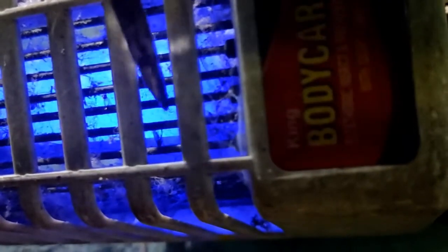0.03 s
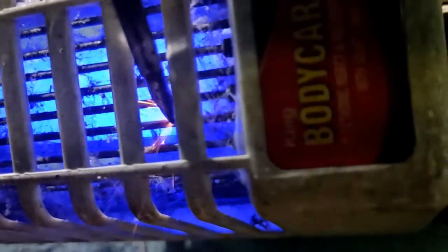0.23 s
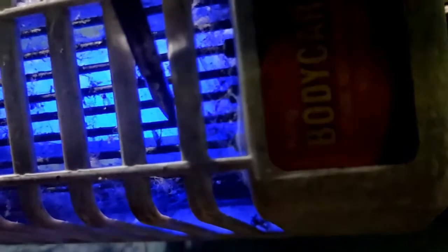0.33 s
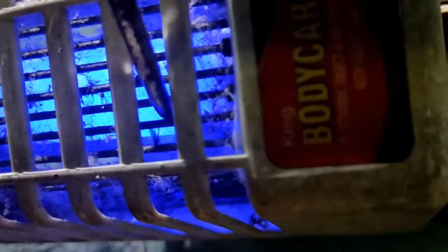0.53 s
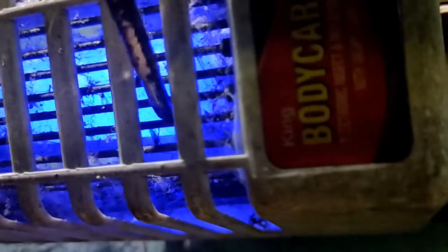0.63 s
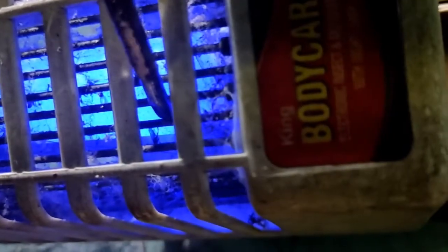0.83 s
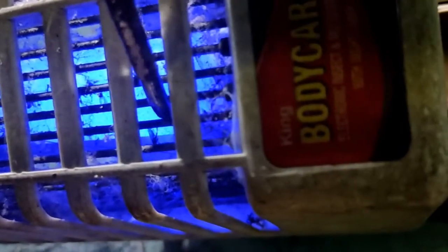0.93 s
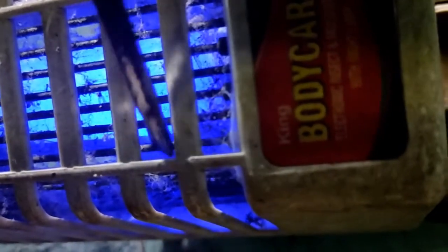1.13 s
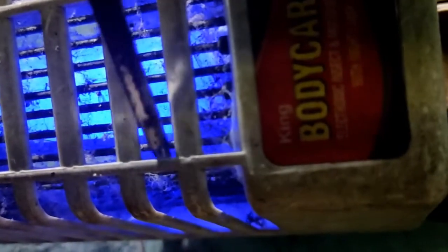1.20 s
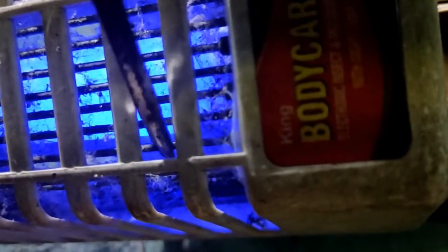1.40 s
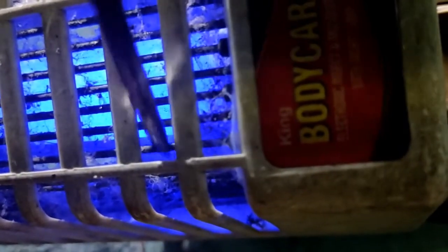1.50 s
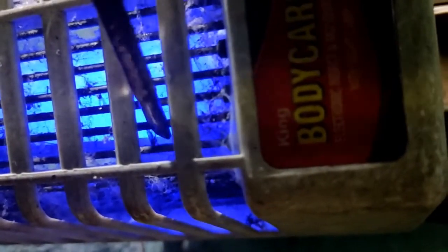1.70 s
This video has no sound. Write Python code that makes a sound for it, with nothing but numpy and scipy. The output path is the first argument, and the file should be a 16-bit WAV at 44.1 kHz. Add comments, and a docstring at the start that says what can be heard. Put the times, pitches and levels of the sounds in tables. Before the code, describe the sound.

An insect zapper crackles with a quick burst of sparks, followed by light metal taps.

```python
"""In a quiet room, a metal tool touches the live grid of an electric insect killer near the microphone.
A quick run of sparks cracks and sizzles inside the cage. Each spark has a falling low chirp, jolts
the microphone into a thump and leaves a bright hiss in the room. Then the tool slides and taps
on the bars, over a low room rumble and a faint hum."""
import sys
import numpy as np
from scipy import signal
from scipy.fft import rfft, irfft
from scipy.io import wavfile

SR = 44100
rng = np.random.default_rng(int(sys.argv[2]) if len(sys.argv) > 2 else 0)


def put_to_file(sound):
    """Save the sound as 16-bit audio at rate SR, in the file named by the first command-line argument."""
    columns = np.atleast_2d(sound).T  # one column per channel
    safe = np.clip(columns, -1, 1)
    whole_steps = np.round(safe * 32767)
    wavfile.write(sys.argv[1], SR, whole_steps.astype(np.int16))


N = 77175
T = np.arange(N) / SR

# the sparks: (time [s], crack [dB], treble ring [dB], low chirp [dB], room hiss [dB], fade time [s],
# jolt of the left microphone [gain], jolt of the right microphone [gain])
SPARKS = [(0.2093, -7.5, -16, -12, -29.5, 0.0055, -0.17, -0.14),
          (0.2152, -13, -27.5, -19.5, -30, 0.0026, 0.11, 0.037),
          (0.2232, -25, -26, -12, -35.5, 0.0006, -0.026, -0.036),
          (0.2461, -15, -20.5, -11.5, -33.5, 0.0011, -0.12, 0.058),
          (0.265, -13.5, -13, -11, -36, 0.0022, 0.013, 0.16),
          (0.2933, -9, -11, -9.5, -44.5, .0016, 0.25, -0.3),
          (0.3243, -7.5, -4.5, -13, -52.5, 0.0011, 0.15, 0.054)]
ROOM_RISE_S = 0.0037   # how fast the room's echo builds up
BASS_CUT_HZ = 146.5   # bottom edge of the sparks' chirp and hiss


def amp(db):
    """Turn decibels into a gain."""
    return 10 ** (np.asarray(db) / 20)


def rms_one(x):
    """Scale a signal to an average power of 1."""
    return x / np.sqrt(np.mean(x ** 2) + 1e-20)


def noise():
    """White noise, unrelated left and right."""
    return rng.standard_normal((2, N))


def near_noise(shared):
    """White noise of a close source: a share (0 to 1) of its power is common to both sides."""
    return np.sqrt(shared) * noise()[:1] + np.sqrt(1 - shared) * noise()


def keep_band(x, hz, kind, order=2):
    """Keep the "low" or the "high" side of a frequency."""
    return signal.sosfilt(signal.butter(order, hz, kind, fs=SR, output="sos"), x)


def colour(x, points):
    """Shape the tone by (frequency [Hz], level [dB]) points; white noise keeps its power."""
    size = 8192
    hz, db = np.transpose(points)
    log_hz = np.log(np.fft.rfftfreq(size, 1 / SR) + 1)
    gain = rms_one(amp(np.interp(log_hz, np.log(hz), db)))
    # minimum phase: the filter rings after a hit, never before it
    cepstrum = irfft(np.log(gain))
    cepstrum[1:size // 2] *= 2
    cepstrum[size // 2 + 1:] = 0
    response = irfft(np.exp(rfft(cepstrum)))
    return signal.fftconvolve(x, response[None], axes=-1)[:, :N]


def burst(start, rise_s, fade_s):
    """Loudness curve of a hit: a straight rise, then an exponential fall."""
    age = T - start
    return np.clip(age / rise_s, 0, 1) * np.exp(-np.maximum(age - rise_s, 0) / fade_s)


def tail(hits, t60_s, rise_s=ROOM_RISE_S):
    """Loudness curve of the echo of (time [s], level [dB]) hits; each falls 60 dB in t60_s."""
    fade_s = t60_s / np.log(1000)
    return np.sqrt(sum((amp(db) * burst(start, rise_s, fade_s)) ** 2 for start, db in hits))


def place(x, pan_db, left_lag_s=0.0005):
    """Sound from the cage reaches the right side first and is a little louder on the left."""
    left = np.roll(x[0], int(left_lag_s * SR))
    return np.array([left * amp(pan_db), x[-1] * amp(-pan_db)])


def smear(x, hz, stages):
    """All-pass filters make the lows arrive late, so a pulse becomes a falling chirp."""
    pole = np.exp(-2 * np.pi * hz / SR)
    for _ in range(stages):
        x = signal.lfilter([-pole, 1], [1, -pole], x + 1e-18)
    return x


def background():
    """The room rumbles, alike on both sides in the bass, with a faint hum."""
    # tone of the rumble: (frequency [Hz], level [dB])
    rumble_tone = [(25, 1), (60, 2.5), (110, 1), (170, 4), (260, -1.5), (370, -2), (520, -15.5), (850, -14),
                   (1300, -24), (2400, -23), (4500, -32.5), (6000, -29.5), (7400, -23), (9000, -34.5),
                   (10200, -45.5), (15000, -55.5)]
    # pure tones of the hum: (frequency [Hz], level [dB])
    hum_tones = [(80.7, -66.5), (156.1, -68), (349.9, -70)]
    split_hz, rumble_db, pan_db = 450, -50.5, 1.68
    shared_bass = 0.66 * keep_band(noise()[:1], split_hz, "low")
    wide_treble = 0.47 * keep_band(noise(), split_hz, "high")
    rumble = amp(rumble_db) * colour(shared_bass + wide_treble + 0.5 * noise(), rumble_tone)
    hum = sum(np.sqrt(2) * amp(db) * np.sin(2 * np.pi * (hz * T + rng.random())) for hz, db in hum_tones)
    return (rumble + hum) * amp([[pan_db], [-pan_db]])


def slides():
    """Metal drags on metal: an uneven rasp and a thin squeal swell and fade."""
    # strokes along a bar: (middle time [s], half length [s], squeal [dB], rasp [dB])
    strokes = [(0.008, 0.098, -56.5, -67.5), (1.391, 0.097, -64, -58), (1.492, 0.032, -55, -77),
               (1.587, 0.029, -53, -52.5)]
    # tones of the squeal and the rasp: (frequency [Hz], level [dB])
    squeal_tone = [(4500, -47), (6200, -25.5), (6750, -12.5), (7050, 1), (7450, -27), (8800, -22.5),
                   (10000, -42.5), (15000, -49.5)]
    rasp_tone = [(400, 0.5), (1300, -6), (2300, -3), (2750, 1), (3350, 2.5), (4000, -5), (4800, -9),
                 (8000, 1.5), (10000, -22.5), (15000, -28.5)]
    rough_db, rough_hz = 1, 77
    squeal_level, rasp_level = 0, 0
    for middle, half_s, squeal_db, rasp_db in strokes:
        swell = np.exp(-0.5 * ((T - middle) / half_s) ** 2)
        squeal_level += amp(squeal_db) * swell
        rasp_level += amp(rasp_db) * swell
    grip = amp(rough_db * rms_one(keep_band(noise()[0], rough_hz, "low")))
    squeal = colour(near_noise(shared=1) * grip * squeal_level, squeal_tone)
    rasp = colour(noise() * grip * rasp_level, rasp_tone)
    return squeal + rasp


def taps():
    """Each tap is a bright metal click and a duller, ringing knock of the housing, with a short echo."""
    # taps on the bars: (time [s], click [dB], knock [dB], click fade time [s], knock pitch [Hz])
    hits = [(0.0085, -33.5, -52, 0.0025, 844), (1.0619, -33.5, -32, 0.0049, 670),
            (1.101, -50, -49, 0.0041, 756), (1.226, -43, -42.5, .003, 610), (1.3436, -44, -41, 0.005, 830),
            (1.356, -48.5, -71, 0.0024, 810), (1.572, -35, -58, 0.0061, 935),
            (1.5764, -22.5, -35, 0.0034, 1010), (1.5918, -25, -34, 0.0067, 917)]
    # tones of the click and the knock: (frequency [Hz], level [dB])
    click_tone = [(800, -32), (2000, -6.5), (3500, -26.5), (4500, -7.5), (5800, -7.5), (7200, 4),
                  (8800, 0.5), (10000, -14), (15000, -29)]
    knock_tone = [(150, -16), (400, 2), (700, 1), (1300, -3.5), (2100, -8), (3400, -7), (5000, -22),
                  (12000, -33.5)]
    ring_width_hz, ring_db, room_db = 73, 7, -21.5
    contact = near_noise(shared=0.6)
    click_level, knock = 0, 0
    for start, click_db, knock_db, fade_s, hz in hits:
        click_level += amp(click_db) * burst(start, rise_s=0.0009, fade_s=fade_s)
        blow = contact * amp(knock_db) * burst(start, rise_s=0.0016, fade_s=0.009) + 1e-18
        ring = signal.lfilter(*signal.iirpeak(hz, hz / ring_width_hz, fs=SR), blow)
        knock += blow + amp(ring_db) * ring
    direct = colour(near_noise(shared=0.27) * click_level, click_tone) + colour(knock, knock_tone)
    click_echo = noise() * tail([(start, db) for start, db, *_ in hits], t60_s=0.25)
    knock_echo = noise() * tail([(start, db) for start, _, db, *_ in hits], t60_s=0.25)
    room = colour(click_echo, click_tone) + colour(knock_echo, knock_tone)
    return place(direct, pan_db=0.7) + amp(room_db) * room


def thumps():
    """Each spark's blast jolts both sides of the overloaded microphone, which swing slowly to rest."""
    swing_hz, fade_s = 1.2, 1 / np.log(1000)   # falls 60 dB in one second
    # (time [s], rise [s], left jolt [gain], right jolt [gain])
    jolts = [(start, 0.0023, left, right) for start, *_, left, right in SPARKS]
    jolts.append((0.391, 0.044, 0.062, 0.26))   # a soft thump follows
    swing = 0
    for start, rise_s, left, right in jolts:
        sway = np.cos(2 * np.pi * swing_hz * (T - start))
        swing += np.array([[left], [right]]) * burst(start, rise_s, fade_s) * sway
    return keep_band(swing, hz=66, kind="low")


def spark_hiss():
    """The room answers the sparks with a bright hiss whose treble lingers."""
    # tone of the hiss: (frequency [Hz], level [dB])
    hiss_tone = [(200, -29), (600, -11.5), (2500, -12), (4000, -10), (6000, -8), (7400, 6), (8500, 0.5),
                 (9800, -10), (15000, -20.5)]
    hits = [(start, hiss_db) for start, _, _, _, hiss_db, *_ in SPARKS]
    early = noise() * tail(hits, t60_s=0.24)
    late = keep_band(noise(), hz=4080, kind="high", order=1) * tail(hits, t60_s=0.62)
    return keep_band(colour(early + amp(-1.5) * late, hiss_tone), BASS_CUT_HZ, "high")


def sizzle():
    """A dense run of tiny sparks sizzles, then dies away."""
    # tone of the sizzle: (frequency [Hz], level [dB])
    sizzle_tone = [(500, -11.5), (2500, 8), (4000, -16), (6500, -18), (7500, -3.5), (8800, 3), (9800, -4),
                   (15000, -13.5)]
    start, hold_s, fade_s = 0.221, 0.031, 0.012
    pops_per_s, spread_db, level_db = 500, 5.5, -24.5
    sizes = amp(spread_db * np.minimum(rng.exponential(1, N), 4))
    signs = rng.choice([-1, 1], N)
    fires = rng.random((2, N)) < pops_per_s / SR
    pops = rms_one(sizes * signs * fires)
    loudness = (T > start) * np.exp(-np.maximum(T - start - hold_s, 0) / fade_s)
    return amp(level_db) * colour(pops * loudness, sizzle_tone)


def chirps():
    """The recorder's filter smears the bass of each spark's pressure pulse into a falling chirp."""
    top_hz, left_smear_hz, right_smear_hz = 342.3, 950, 1080
    pulses = np.zeros(N)
    for start, _, _, chirp_db, *_ in SPARKS:
        pulses[int(start * SR)] = amp(chirp_db) * SR / (2 * top_hz)
    bass_cut = signal.cheby1(8, 0.5, BASS_CUT_HZ, "high", fs=SR, output="sos")
    lows = signal.sosfilt(bass_cut, keep_band(pulses + 1e-18, top_hz, "low"))
    return np.array([smear(lows, hz, stages=12) for hz in (left_smear_hz, right_smear_hz)])


def bounces(start, fade_s, gap_s=0.0012, step_db=-15):
    """A pulse and three dying echoes between the bars; a longer spark makes them stronger."""
    pulses = np.zeros(N)
    for k in range(4):
        pulses[int((start + k * gap_s) * SR)] += amp(k * step_db)
    return pulses * np.sqrt(fade_s * SR) / 2


def sparks():
    """Each spark cracks and rings in the cage; the recorder's filter smears its bass into a chirp."""
    # tones of the crack and the ring: (frequency [Hz], level [dB])
    crack_tone = [(250, -15.5), (500, 5), (950, 1.5), (1400, -5.5), (2100, -8.5), (2750, 0.5),
                  (3100, -16.5), (5000, -11), (7000, -24), (15000, -30.5)]
    ring_tone = [(3000, -15), (6200, -25.5), (6900, 0), (7500, 1), (8200, -13.5), (9200, 1), (9900, -12),
                 (15000, -19.5)]
    rise_s, scatter_db, cage_echo_db = 0.00052, -2, -26.5
    reflections = near_noise(shared=0.2)   # the same pattern for every spark
    crack, ring = 0, 0
    for start, crack_db, ring_db, _, _, fade_s, _, _ in SPARKS:
        snap = np.roll(reflections, int(start * SR), axis=1) * burst(start, rise_s, fade_s)
        crack += amp(crack_db) * (bounces(start, fade_s) + amp(scatter_db) * snap)
        ring += amp(ring_db) * snap
    hits = [(start, crack_db) for start, crack_db, *_ in SPARKS]
    crack += amp(cage_echo_db) * noise() * tail(hits, t60_s=0.089, rise_s=rise_s)
    crack = smear(colour(crack, crack_tone), hz=2040, stages=8)
    return place(crack + colour(ring, ring_tone) + chirps(), pan_db=0.4)


def scene():
    """Sparks, then the tool on the bars, in a quiet room."""
    return sparks() + sizzle() + spark_hiss() + thumps() + taps() + slides() + background()


def record(dry):
    """The microphone rounds off loud peaks, and the highest treble is cut."""
    ceiling, top_hz = 1.1, 15700
    treble_cut = signal.ellip(10, 0.1, 70, top_hz, fs=SR, output="sos")
    return signal.sosfilt(treble_cut, ceiling * np.tanh(dry / ceiling))


dry = scene()
out = record(dry)
put_to_file(out)
```